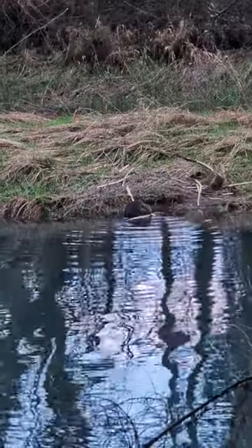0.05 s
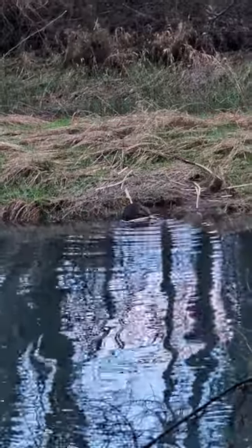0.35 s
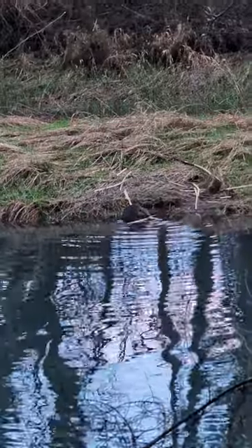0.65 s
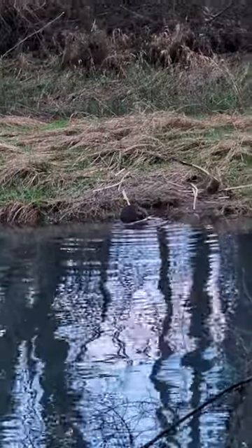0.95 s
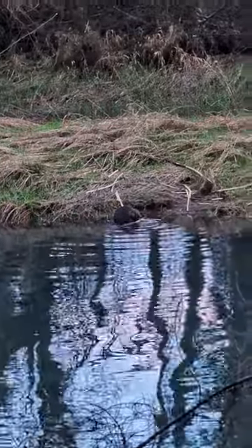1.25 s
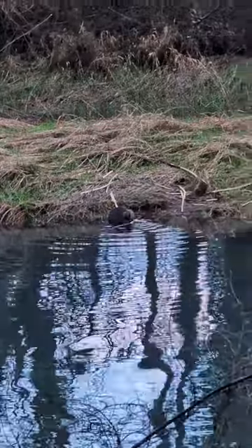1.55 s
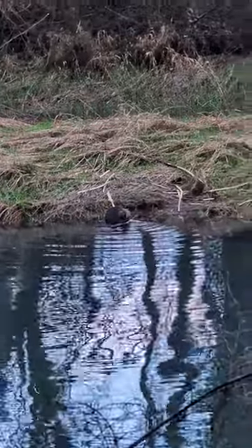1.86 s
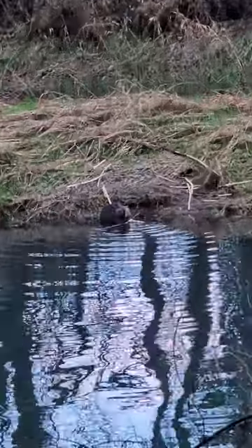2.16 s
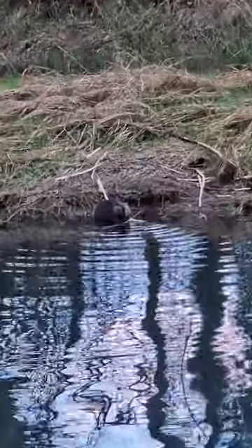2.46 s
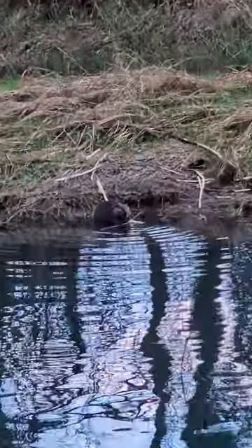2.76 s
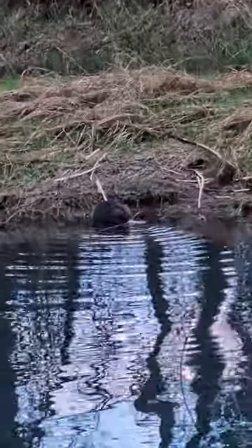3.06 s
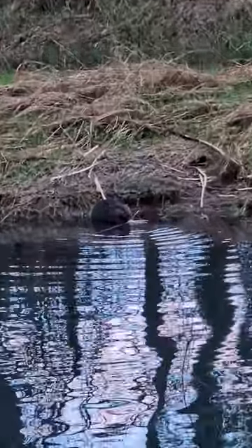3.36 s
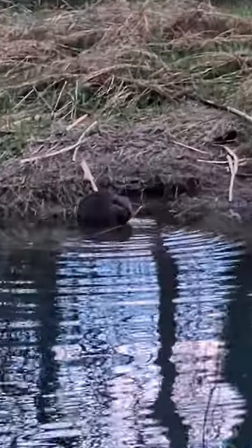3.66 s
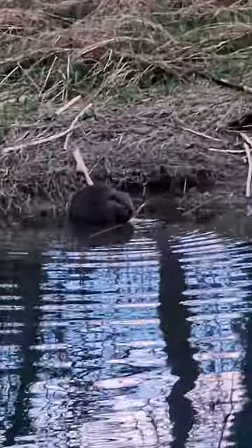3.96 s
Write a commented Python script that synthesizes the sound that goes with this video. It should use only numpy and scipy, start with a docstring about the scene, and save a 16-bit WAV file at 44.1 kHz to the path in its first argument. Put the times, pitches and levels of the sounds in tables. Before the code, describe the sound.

Distant traffic rumbles steadily over a quiet river bank. A soft swish comes on the right at the start, then faint bird twitter and thin high whistles, with a few tiny close ticks, the clearest at 1 second. At 1.8 seconds the rumble abruptly turns deeper, duller and somewhat louder, with far engines droning. A small bird very faintly repeats a two-note call from 1.7 to 2.7 seconds.

```python
"""Quiet river bank, distant traffic

Traffic rumbles as coloured noise; far engines drone as wavering sines. Birds are gliding tones scattered
by trees: far twitter, a repeated two-note call. Thin whistles, one hissy and arching to about 7 kHz.
One soft noise swish, a few ringing ticks.
At 1.8 s the sound abruptly turns deeper, duller and centred; birds and whistles drop in level."""
import sys
import numpy as np
from scipy import signal
from scipy.fft import rfft, irfft
from scipy.io import wavfile

SR = 44100
rng = np.random.default_rng(int(sys.argv[2]) if len(sys.argv) > 2 else 0)


def dump(signal):
    """Clip the signal to [-1, 1] and save it as 16-bit WAV at the path in sys.argv[1]."""
    limited = np.clip(np.atleast_2d(signal).T, -1, 1)
    pcm = np.round(limited * 32767).astype(np.int16)
    wavfile.write(sys.argv[1], SR, pcm)


N = 176400
TIME_S = np.arange(N) / SR
BIN_HZ = np.arange(N // 2 + 1) * SR / N

# Background spectra, open and dull: f/Hz, relative density/dB
OPEN_SPECTRUM = [(20, -47), (32, -44), (41, -12.5), (52, 2.5), (70, 1.5), (105, -5), (160, -15), (280, -17),
                 (420, -23.5), (600, -20.5), (900, -20.5), (1500, -23), (2100, -29), (2800, -35),
                 (4000, -42.5), (6300, -49), (8500, -60.5), (15000, -68.5)]
DULL_SPECTRUM = [(20, -46), (32, -41.5), (41, -16.5), (51, -2), (75, 1.5), (125, -3.5), (165, -8.5),
                 (250, -12), (450, -25), (620, -24), (900, -27.5), (1300, -36), (1650, -45), (2050, -44.5),
                 (2900, -58.5), (4200, -65), (6500, -67.5), (10000, -76.5), (15000, -81)]
# Left-right coherence, open and dull: f/Hz, coherence/1
OPEN_COHERENCE = [(60, 0.98), (180, 0.99), (300, 0.97), (500, 0.8), (890, 0.83), (1280, 0.41), (1950, 0.52),
                  (2500, 0.12), (8000, 0.021)]
DULL_COHERENCE = [(90, 1), (180, .99), (300, 0.99), (520, 0.93), (890, 0.95), (1550, 0.68), (2150, 0.75),
                  (2550, 0.55), (3000, 0.14), (6000, 0.02)]
# Open background balance: f/Hz, left minus right/dB
OPEN_PAN = [(60, -0.5), (300, -1.5), (520, 0.5), (890, -1), (1520, -6.5), (2600, -3.5), (6500, -3.5),
            (13000, -0.5)]
# Traffic reaches the left ear first: f/Hz, right lag/rad
RIGHT_PHASE_LAG = [(60, .02), (180, .06), (500, 0.37), (950, 0.38), (1250, .5), (1500, 1.05), (2000, 2.26),
                   (2350, 3.25), (2650, 4.2), (3200, 6.3)]
# Deep rumble swell: t/s, gain/dB
RUMBLE_SWELL = [(0, 0.5), (0.7, 0), (1.45, -0.5), (1.85, 0.5), (2.05, 4), (2.35, 1), (2.55, 1.5), (2.9, 1),
                (3.3, -1), (4, 1.5)]
# Swish spectrum: f/Hz, relative density/dB
SWISH_SPECTRUM = [(200, -18), (1800, -3), (2800, 6), (4500, 6), (7000, 1.5), (10500, -3), (15000, -12)]
# Contacts: t/s, level/dB
TICK_HITS = [(.3174, -69), (.8315, -72), (1.0262, -58.5), (1.728, -71), (3.5705, -81)]
# Tick resonances: f/Hz, relative level/dB, T60/s
TICK_RESONANCES = [(4670, -2, 0.007), (5300, -1, .006), (6150, 0, 0.0055), (7850, -2.5, 0.006),
                   (8600, -7, .006), (11700, -12, .004)]
# Whistles: t/s, length/s, start f/Hz, middle f/Hz, end f/Hz, level while open/dB, flutter/Hz
WHISTLE_NOTES = [(0.32, .05, 4800, 4950, 4770, -78, 150), (0.437, 0.097, 4000, 5100, 5400, -77.5, 70),
                 (.505, .115, 5250, 5000, 4500, -78, 80), (.895, 0.13, 4900, 6770, 7260, -82, 280),
                 (.98, 0.16, 7150, 7080, 6400, -83, 333), (1.735, .04, 7100, 6790, 6450, -87.5, 252),
                 (2.011, 0.024, 4500, 4700, 4400, -70, 150), (3.957, .025, 4500, 4650, 4470, -76.5, 200)]
# Engines: start t/s, end t/s, f/Hz, wander/Hz, level while dull/dB
ENGINE_DRONES = [(1.1, 3.0, 240, 3.5, -60), (2.7, 4.7, 203, 3, -60.5), (2.1, 3.45, 80.6, 1.2, -49.5),
                 (1.5, 5.3, 125, 3.6, -55)]
# Two-note calls: t/s, high and low note level while open/dB, high note fall/Hz
CALL_NOTES = [(1.733, -65, -63.5, 616), (1.847, -69.5, -66.5, 481), (1.968, -71, -70, 428),
              (2.095, -71.5, -75.5, 482), (2.221, -71, -71.5, 328), (2.373, -72, -77, 400),
              (2.512, -70.5, -73.5, 318), (2.658, -73, -77, 380)]


def from_db(db):
    """Decibels to gain."""
    return 10 ** (np.asarray(db) / 20)


def unit_rms(x):
    """Scale to rms 1."""
    return x / np.sqrt(np.mean(x ** 2) + 1e-20)


def per_bin(table):
    """Table value at each FFT bin, on a log-frequency axis."""
    hz, value = np.transpose(table)
    return np.interp(np.log(np.maximum(BIN_HZ, 1)), np.log(hz), value)


def pan(left_minus_right_db):
    """Constant-power stereo gains."""
    ratio = from_db(np.atleast_1d(left_minus_right_db))
    return np.array([ratio, np.ones_like(ratio)]) * np.sqrt(2 / (1 + ratio ** 2))


def drift(rate_hz, size=N):
    """Low-passed random wander, rms 1."""
    hz = np.arange(size // 2 + 1) * SR / size
    return unit_rms(irfft(rfft(rng.standard_normal(size)) / (1 + (hz / rate_hz) ** 2), size))


def add(out, start_s, sound):
    """Mix a sound in at start_s."""
    i = int(np.clip(start_s * SR, 0, N - 1))
    out[i:i + len(sound)] += sound[:N - i]


def dullness(switch_s=1.821, fade_s=0.004):
    """Fast crossfade: 0 open, 1 dull."""
    return np.clip((TIME_S - switch_s) / fade_s + 0.5, 0, 1)


def air_noise(spectrum, coherence=0, pan_db=0):
    """Coloured stereo noise, right ear late, rms 1."""
    mid, side = rfft(rng.standard_normal((2, N)))
    coherence = np.clip(coherence, -0.999, 0.999)
    ears = np.sqrt(1 + coherence) * mid + np.sqrt(1 - coherence) * side * np.array([[1], [-1]])
    ears[1] *= np.exp(-1j * per_bin(RIGHT_PHASE_LAG))
    return unit_rms(irfft(ears * from_db(per_bin(spectrum)) * pan(pan_db), N))


def flicker(x, low_hz=2600, high_hz=9000, bands=20, depth_db=1.5, rate_hz=21):
    """Narrow treble bands waver independently in level."""
    band = np.searchsorted(np.geomspace(low_hz, high_hz, bands + 1), BIN_HZ)
    spectrum = rfft(x)
    for k in range(1, bands + 1):
        gain = unit_rms(from_db(depth_db * drift(rate_hz)))
        x = x + irfft(spectrum * (band == k), N) * (gain - 1)
    return x


def traffic(open_db=-49, dull_db=-42, rumble_top_hz=139):
    """Far traffic and air: bright and wide, then deep and dull. The rumble swells slowly."""
    dull = dullness()
    before = from_db(open_db) * air_noise(OPEN_SPECTRUM, per_bin(OPEN_COHERENCE), per_bin(OPEN_PAN))
    after = from_db(dull_db) * air_noise(DULL_SPECTRUM, per_bin(DULL_COHERENCE))
    air = flicker((1 - dull) * before + dull * after)
    rumble = signal.sosfiltfilt(signal.butter(2, rumble_top_hz, fs=SR, output="sos"), air)
    swell = from_db(np.interp(TIME_S, *np.transpose(RUMBLE_SWELL)))
    return air + rumble * (swell - 1)


def arc_note(length_s, start_hz, middle_hz, end_hz, flutter_hz):
    """Fluttering sine on a pitch arc; swells and fades."""
    progress = np.linspace(0, 1, int(length_s * SR))
    arc = np.polyfit([0, 0.5, 1], [start_hz, middle_hz, end_hz], 2)
    hz = np.polyval(arc, progress) + flutter_hz * drift(400, size=len(progress))
    return np.sin(np.pi * progress) * np.sin(2 * np.pi * np.cumsum(hz) / SR)


def twitter(rate_per_s=19, low_hz=2580, high_hz=3750, length_s=0.04, open_db=-82.5):
    """Far birds: short glides at random times and pitches."""
    out = np.zeros(N)
    for when, pitch, glide in rng.random((int(rate_per_s * N / SR), 3)):
        hz = low_hz * (high_hz / low_hz) ** pitch
        slide_hz = 0.036 * (glide - 0.5) * hz
        chirp = arc_note(length_s, hz - slide_hz, hz, hz + slide_hz, flutter_hz=150)
        add(out, when * N / SR, from_db(open_db) * chirp)
    return out


def among_trees(direct, scatter_db=-3, t60_s=0.55):
    """Direct sound plus diffuse scatter from trees, different in each ear."""
    tail = rng.standard_normal((2, SR)) * from_db(-60 * TIME_S[:SR] / t60_s)
    tail /= np.sqrt(np.sum(tail ** 2, axis=1, keepdims=True))
    return direct + from_db(scatter_db) * signal.fftconvolve(direct[None], tail, axes=1)[:, :N]


def swish(peak_s=0.1, rise_s=0.047, fall_s=0.052, level_db=-63.5, grain_db=1.2, pan_db=-10.5):
    """One soft, grainy swell of noise on the right."""
    width_s = np.where(TIME_S < peak_s, rise_s, fall_s)
    swell = np.exp(1 - np.sqrt(1 + ((TIME_S - peak_s) / width_s) ** 2))
    gain = from_db(level_db + grain_db * drift(rate_hz=150))
    return gain * swell * pan(pan_db) * air_noise(SWISH_SPECTRUM)


def ticks(rise_s=0.00008, touch_lead_s=0.0007, touch_db=-9):
    """Tiny dry ticks close by: a light touch, then the contact, each ringing a few ms."""
    out, t = np.zeros(N), TIME_S[:SR // 20]
    ring = sum((-1) ** k * from_db(db - 60 * t / t60_s) * np.sin(2 * np.pi * hz * t)
               for k, (hz, db, t60_s) in enumerate(TICK_RESONANCES))
    ring *= 1 - np.exp(-t / rise_s)
    for start_s, db in TICK_HITS:
        add(out, start_s - touch_lead_s, from_db(db + touch_db) * ring)
        add(out, start_s, from_db(db) * ring)
    return out


def whistles():
    """Thin, high whistles; near 1 s a hissy one arches up to about 7 kHz and back down."""
    out = np.zeros(N)
    for start_s, length_s, start_hz, middle_hz, end_hz, db, flutter_hz in WHISTLE_NOTES:
        add(out, start_s, from_db(db) * arc_note(length_s, start_hz, middle_hz, end_hz, flutter_hz))
    return out


def engines(fade_s=0.46, waver_db=2.0, open_gain_db=-5):
    """Far engine drones rise from the rumble and sink back; weaker before the switch."""
    out = np.zeros(N)
    for start_s, end_s, centre_hz, wander_hz, db in ENGINE_DRONES:
        fade = np.clip(np.minimum(TIME_S - start_s, end_s - TIME_S) / fade_s, 0, 1)
        gain = from_db(db + waver_db * drift(rate_hz=2.7))
        hz = centre_hz + wander_hz * drift(rate_hz=6)
        out += fade * gain * np.sin(2 * np.pi * np.cumsum(hz) / SR)
    return out * from_db(open_gain_db * (1 - dullness()))


def calls(pitches_hz=(4290, 2660), low_fall_hz=254, high_s=0.04, low_s=0.041, low_delay_s=0.026):
    """A small bird repeats a high-low pair of falling notes."""
    out = np.zeros(N)
    for start_s, high_db, low_db, fall_hz in CALL_NOTES:
        high_hz, low_hz = np.array(pitches_hz) * (1 + 0.005 * rng.standard_normal(2))
        high = arc_note(high_s, high_hz, high_hz - 0.26 * fall_hz, high_hz - fall_hz, flutter_hz=100)
        low = arc_note(low_s, low_hz, low_hz - low_fall_hz / 2, low_hz - low_fall_hz, flutter_hz=150)
        add(out, start_s, from_db(high_db) * high)
        add(out, start_s + low_delay_s, from_db(low_db) * low)
    return out


def birds_and_whistles(open_pan_db=-8, dull_gain_db=-12.5):
    """On the right, then quieter and centred after the switch."""
    dull = dullness()
    notes = among_trees(calls() + whistles() + twitter())
    return from_db(dull_gain_db * dull) * pan(open_pan_db * (1 - dull)) * notes


def scene():
    """Stereo mix at the bank."""
    return traffic() + engines() + ticks() + swish() + birds_and_whistles()


def record(dry):
    """Steep low-pass, 60 dB down at 16.2 kHz."""
    return signal.sosfilt(signal.cheby2(16, 60, 16200, fs=SR, output="sos"), dry)


dry = scene()
out = record(dry)
dump(out)
```